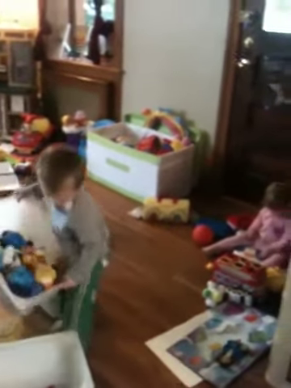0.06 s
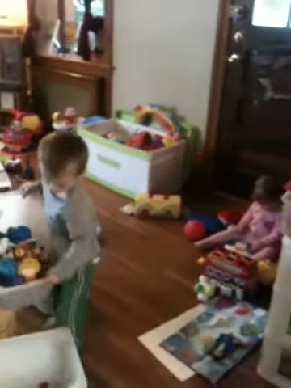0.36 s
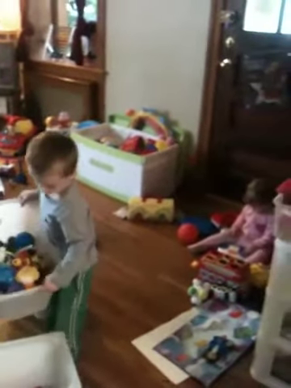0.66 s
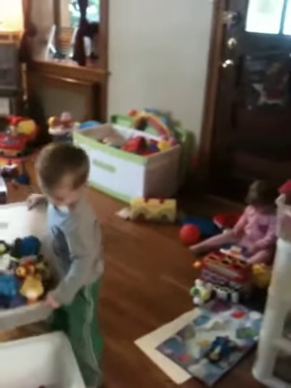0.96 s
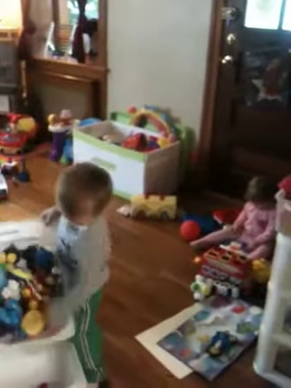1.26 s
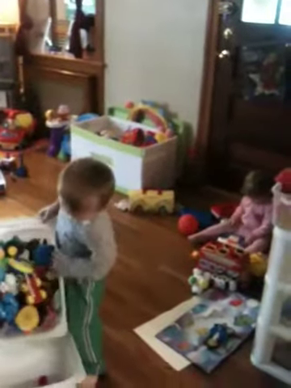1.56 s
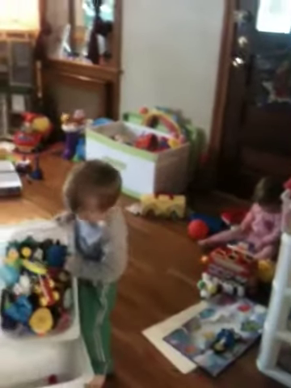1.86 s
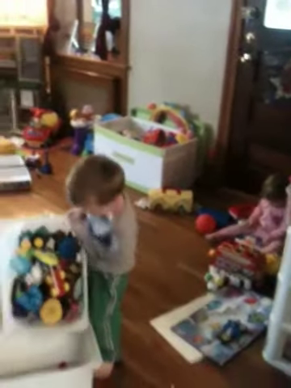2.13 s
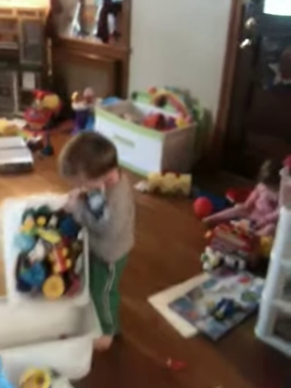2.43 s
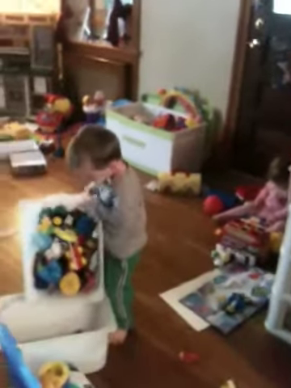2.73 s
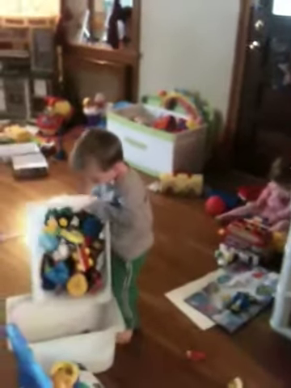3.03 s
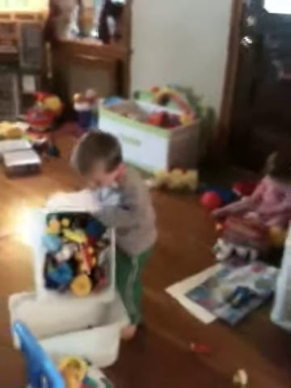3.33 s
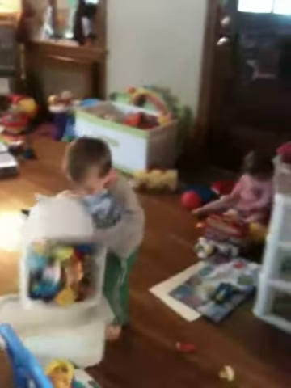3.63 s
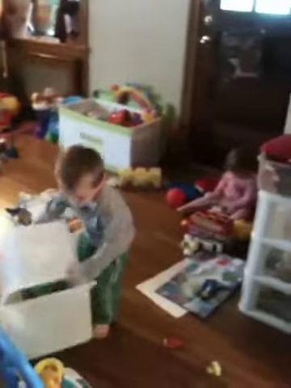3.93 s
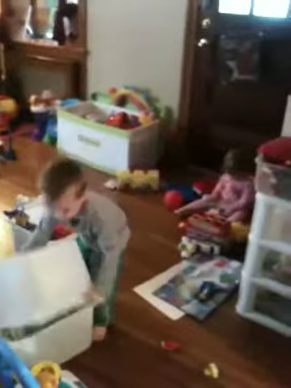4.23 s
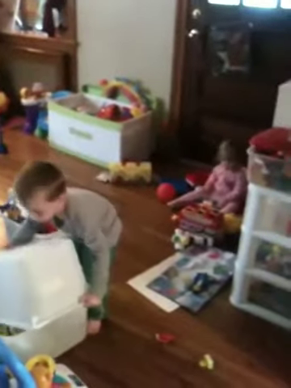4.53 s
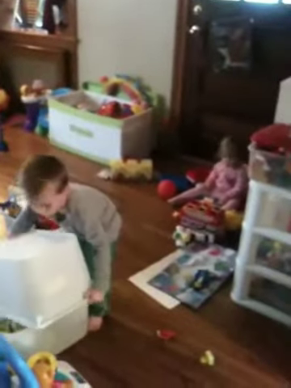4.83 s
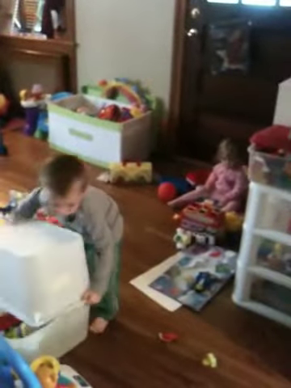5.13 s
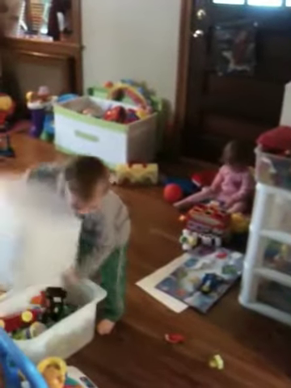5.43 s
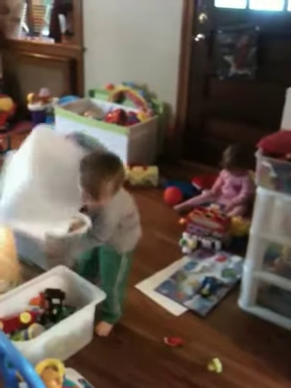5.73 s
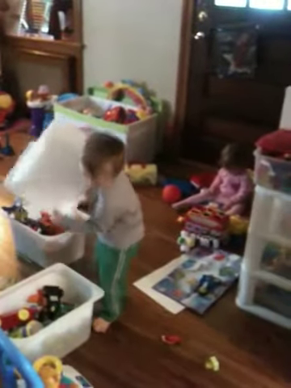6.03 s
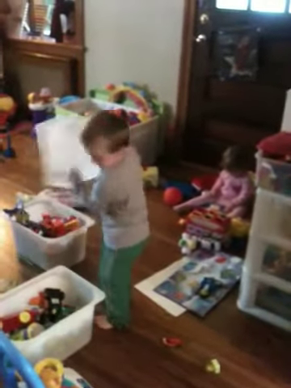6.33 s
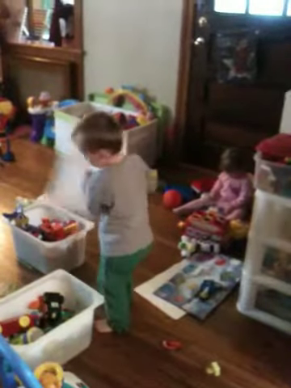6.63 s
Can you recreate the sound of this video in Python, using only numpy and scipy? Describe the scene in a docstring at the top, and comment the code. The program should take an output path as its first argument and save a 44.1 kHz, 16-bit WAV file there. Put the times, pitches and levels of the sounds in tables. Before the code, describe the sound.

In a quiet living room, a bin of plastic toys gives scattered soft rattles, clicks and dull knocks. The plastic ticks, then the load tumbles all at once into another bin with sharp clacks and hollow booms. The clatter thins, a last small spill follows, and a faint brush of cloth on plastic ends it. Everything is heard from one position, with slight room reverberation over a low hush.

```python
"""Toys tipped from bin to bin.

A child carries a plastic bin of toys across a living room and tips it into a second bin.
Hollow toys shift, clack and tumble; their blows drum on the thin walls, and strained plastic ticks.
The emptied bin is lifted away with a soft rub. A wooden-floored room answers."""
import sys
import numpy as np
from scipy import signal
from scipy.fft import rfft, irfft, next_fast_len
from scipy.io import wavfile
from scipy.ndimage import uniform_filter1d

SR = 44100
rng = np.random.default_rng(int(sys.argv[2]) if len(sys.argv) > 2 else 0)


def generate_wav(sig):
    """Save sig (samples, or channels by samples) to the path in sys.argv[1] as 16-bit PCM at SR."""
    pcm = np.round(np.clip(np.atleast_2d(sig).T, -1, 1) * 32767).astype(np.int16)
    wavfile.write(sys.argv[1], SR, pcm)


N = 295029
TIME_S = np.arange(N) / SR
BLOW_TIME_S = np.arange(SR // 2) / SR
POUR_START_S, POUR_END_S = 3.85, 5.0


def amp(db):
    """Decibels to gain."""
    return 10 ** (np.asarray(db) / 20)


def unit(x):
    """Scale to rms 1."""
    return x / np.sqrt(np.mean(x ** 2) + 1e-20)


def burst(x):
    """Scale to the energy of 5 ms at rms 1."""
    return x / np.sqrt(np.sum(x ** 2) / (.005 * SR) + 1e-20)


def curve(points):
    """Function of frequency through (f/Hz, value) points, on a log axis."""
    hz, values = np.transpose(points)
    return lambda f: np.interp(np.log(f + 1), np.log(hz + 1), values)


def hump(centre_hz, octaves, depth_db):
    """Broad resonance curve; the skirts level out depth_db below the top."""
    return lambda hz: depth_db * (1 / (1 + (np.log2((hz + 1) / centre_hz) / octaves) ** 2) - 1)


def colour(x, gain_db):
    """Minimum-phase filter with response gain_db(f)."""
    size = 2 * next_fast_len(len(x) // 2 + 4096)
    cepstrum = irfft(np.log(amp(gain_db(np.fft.rfftfreq(size, 1 / SR))) + 1e-6))
    cepstrum[1:size // 2] *= 2
    cepstrum[size // 2 + 1:] = 0
    return irfft(rfft(x, size) * np.exp(rfft(cepstrum)), size)[:len(x)]


def add(track, start_s, x):
    """Mix x into the track at start_s."""
    start = max(round(start_s * SR), 0)
    track[start:start + len(x)] += x[:N - start]


def swell(start_s, length_s, rise_db_per_s, sag_db_per_s, fall_db_per_s):
    """Attack, sagging hold and release, in dB."""
    age_s = TIME_S - start_s
    attack_db = rise_db_per_s * np.minimum(age_s, 0)
    sag_db = sag_db_per_s * np.clip(age_s, 0, length_s)
    return attack_db - sag_db - fall_db_per_s * np.maximum(age_s - length_s, 0)


def loudest(levels_db):
    """Upper envelope of overlapping levels."""
    return np.maximum(np.max(levels_db, axis=0), -120)


def ring(hz, db, t60_s):
    """Sum of damped modes with random polarity."""
    hz, db, t60_s = (np.reshape(v, (-1, 1)) for v in (hz, db, t60_s))
    modes = amp(db - 60 * BLOW_TIME_S / t60_s) * np.sin(2 * np.pi * hz * BLOW_TIME_S)
    return rng.choice([-1, 1], len(hz)) @ modes


def puff(t60_s):
    """Decaying noise: modes too dense to resolve."""
    return rng.standard_normal(len(BLOW_TIME_S)) * amp(-60 * BLOW_TIME_S / t60_s)


def chatter(blow, span_s, bounce_db, bounces=4):
    """A loose part touches several times in quick succession."""
    hits = np.zeros(SR // 20)
    hits[0] = 1
    signs = rng.choice([-1, 1], bounces)
    hits[rng.integers(20, min(span_s * SR, len(hits) - 1), bounces)] = amp(bounce_db) * signs
    return burst(signal.fftconvolve(blow, hits))


def contacts(level_db, base_rate_hz, scatter_db):
    """Random impulses whose power follows the level; louder is also denser."""
    chance = np.clip(base_rate_hz * amp(.2 * (level_db + 20)), 20, SR) / SR
    at = np.flatnonzero(rng.random(N) < chance)
    sizes = unit(amp(scatter_db * rng.uniform(-1, 1, len(at))))
    pulses = np.zeros(N)
    pulses[at] = sizes * rng.choice([-1, 1], len(at)) / np.sqrt(chance[at])
    return pulses * amp(level_db)


def play(pulses, blow):
    """Sound a unit-energy blow at every impulse."""
    return signal.fftconvolve(pulses, blow / np.linalg.norm(blow))[:N]


# living room decay: f/Hz, t60/s
ROOM_DECAY = [(100, 0.51), (260, 0.21), (700, 0.39), (2000, 0.37), (5000, 0.32), (13000, 0.41)]

def room(x, wet_db):
    """Direct sound plus a diffuse tail, different for every place in the room."""
    hz, t, noise = signal.stft(rng.standard_normal(SR // 2), SR, nperseg=256)
    decay = amp(-60 * t / curve(ROOM_DECAY)(hz)[:, None])
    tail = signal.istft(noise * decay, SR, nperseg=256)[1]
    tail *= 1 - np.exp(-np.arange(len(tail)) / SR / 0.017)
    response = amp(wet_db) * unit(tail) / np.sqrt(len(tail))
    response[0] += 1
    return signal.fftconvolve(x, response)


# hush spectrum: f/Hz, gain/dB
HUSH_SPECTRUM = [(18, -43), (30, -14), (49, -25.5), (85, -7.5), (350, -1.5), (656, -8.5), (709, -11),
                 (1230, -8), (1590, -10), (1770, -10.5), (4310, -14.5), (15500, -25.5)]
# electrical whine: f/Hz, level/dB
WHINE_TONES = [(14971, -87.5)]

def still_air(hush_db=-66.5):
    """Steady room hush with a thin electrical whine."""
    hush = amp(hush_db) * unit(colour(rng.standard_normal(N), curve(HUSH_SPECTRUM)))
    whine = sum(amp(db) * np.sqrt(2) * np.sin(2 * np.pi * hz * TIME_S) for hz, db in WHINE_TONES)
    return hush + whine


# cloth friction spectrum: f/Hz, gain/dB
RUB_SPECTRUM = [(120, -32.5), (200, -7.5), (292, 1), (419, -21), (602, -1.5), (748, -20), (1600, -11.5),
                (2900, -11.5), (15000, -29.5)]
# sleeve or hand strokes on the bin: t/s, length/s, level/dB
RUB_STROKES = [(.15, 0.19, -62), (2.34, 0.19, -65), (3.201, .25, -60), (5.888, .47, -68),
               (6.395, .15, -58.5)]

def rub(flutter_db=1.8):
    """Cloth slides over smooth plastic: a fine, uneven hiss."""
    hiss = unit(colour(rng.standard_normal(N), curve(RUB_SPECTRUM)))
    grip = unit(uniform_filter1d(rng.standard_normal(N), size=500))
    strokes_db = [db + swell(t, length_s, rise_db_per_s=131, sag_db_per_s=0, fall_db_per_s=124)
                  for t, length_s, db in RUB_STROKES]
    return hiss * amp(loudest(strokes_db) + flutter_db * grip)


# snaps in strained plastic: t/s, relative level/dB
STRAIN_TICKS = [(0.0358, -45), (0.1044, -45.5), (3.1457, -40), (3.2321, -49), (3.2809, -42),
                (3.3218, -36.5), (3.3424, -46.5), (3.3712, -40.5), (3.4246, -35.5), (3.5159, -44),
                (3.7349, -29), (5.015, -27)]

def ticks(centre_hz=5000, mode_count=6):
    """Strained plastic lets go in bright, nearly dry snaps that ping briefly."""
    track = np.zeros(N)
    tilt = curve([(200, -21.5), (2000, 2), (11000, -1.5), (15500, -3.5)])
    for t, db in STRAIN_TICKS:
        snap = colour(puff(t60_s=0.043), hump(centre_hz, octaves=0.9, depth_db=25.5))
        ping = ring(centre_hz * np.exp(rng.normal(0, .15, mode_count)), db=0, t60_s=.03)
        click = colour(burst(snap) + amp(-5.5) * burst(ping), tilt)
        add(track, t, room(amp(db) * chatter(click, span_s=.004, bounce_db=-10), wet_db=-10))
    return amp(-7.5) * track


# wall flexing spectrum: f/Hz, gain/dB
FLEX_SPECTRUM = [(18, -74), (30, -46.5), (108, -16.5), (205, -3), (385, -7), (446, -9.5), (532, -5),
                 (1000, -17.5), (1300, -46), (2200, -120)]

def bin_wall(modes, t60_scale, flex_db):
    """A struck wall: modes at random strengths over dull flexing."""
    hz, db, t60_s = np.transpose(modes)
    tone = ring(hz, db + rng.normal(0, 1.5, len(hz)), t60_scale * t60_s)
    # cut the deep rumble below the wall's ringing tones
    tone = colour(tone, curve([(30, -39.5), (90, -21.5), (170, -0.5)]))
    flex = colour(puff(t60_s=0.061), curve(FLEX_SPECTRUM))
    return burst(burst(tone) + amp(flex_db) * burst(flex))


# short, dull wall modes of the carried bin: f/Hz, level/dB, base t60/s
CARRIED_BIN_MODES = [(162, -6, 0.13), (215, -4, 0.047), (299, 2.5, 0.1), (344.2, 1, 0.11), (400, -8.5, .12),
                     (508, 3.5, 0.016), (790, -3, 0.027)]
# free wall modes: f/Hz, level/dB, base t60/s
EMPTY_BIN_MODES = [(175.4, -10, .3), (209.5, -2.5, 0.34), (251.6, -1.5, 0.12), (281.6, -2, 0.18),
                   (383.7, -3.5, 0.084), (442, -8.5, 0.056), (527.7, -2.5, 0.037), (595, -12.5, .12),
                   (732, -5.5, 0.13)]
# blows on a wall: t/s, relative level/dB, boom centre/Hz
WALL_BLOWS = [(0.353, -50, 370), (0.645, -33, 344), (1.053, -46, 280), (1.215, -34, 302),
              (1.238, -29.5, 604), (1.782, -48, 286), (1.926, -42.5, 555), (1.992, -46.5, 316),
              (2.209, -49, 312), (2.79, -43, 272), (3.09, -45, 286), (3.323, -41, 187.4),
              (3.736, -28.5, 265), (3.864, -13.5, 352), (3.921, -27, 288.6), (4.012, -9.5, 232.6),
              (4.397, -26.5, 194), (4.562, -24.5, 205), (4.864, -36, 196), (5.047, -18.5, 223),
              (6.375, -48.5, 176.4), (6.482, -46, 597)]

def thumps():
    """Heavy blows boom in a bin; where they land decides which modes speak."""
    track = np.zeros(N)
    for t, db, hz in WALL_BLOWS:
        modes = EMPTY_BIN_MODES if POUR_START_S < t < POUR_END_S else CARRIED_BIN_MODES
        wall = bin_wall(modes, t60_scale=0.57, flex_db=0.5)
        boom = colour(wall, hump(hz, octaves=1.5, depth_db=26))
        add(track, t, room(amp(db) * burst(boom), wet_db=0))
    return amp(-1.5) * track


def drumming(flow_db, modes, flex_db, wall_count=3):
    """Rolling toys keep a bin's walls sounding."""
    walls = [room(bin_wall(modes, 1, flex_db), wet_db=-9) for _ in range(wall_count)]
    track = sum(play(contacts(flow_db, base_rate_hz=200, scatter_db=2.5), wall) for wall in walls)
    return amp(0.5) * track / np.sqrt(wall_count)


# stiff toy modes: f/Hz, level/dB, t60/s
STIFF_MODES = [(1895, -2, .2), (2490, -2.5, .42), (3182, -12.5, .24), (3400, -12.5, .12)]
# jolts to that toy: t/s, level/dB
STIFF_JOLTS = [(1.459, -47), (3.6, -55), (4.347, -39), (5.14, -45)]

def stiff_toy():
    """One harder toy rings on after each jolt."""
    track = np.zeros(N)
    for t, db in STIFF_JOLTS:
        add(track, t, amp(db) * ring(*np.transpose(STIFF_MODES)))
    return track


# hollow toy modes: frequency ratio, level/dB, t60/s
HOLLOW_MODES = [(.62, -5, .015), (.8, -4, .02), (.93, -3, .03), (1.0, 0, .05), (1.06, -5, .06),
                (1.25, -4, .015), (1.6, -8, .012)]
# knocks on a hollow toy: t/s, relative level/dB, f/Hz
TOY_KNOCKS = [(1.0458, -45, 1628), (1.063, -42.5, 1534), (1.4583, -44, 1970), (2.7564, -39.5, 1576),
              (2.774, -40, 1536), (3.5965, -29, 2560), (5.765, -61, 1570)]

def knocks():
    """A knocked hollow toy gives a short note from a few close modes."""
    track = np.zeros(N)
    ratio, mode_db, t60_s = np.transpose(HOLLOW_MODES)
    for t, db, hz in TOY_KNOCKS:
        note = ring(hz * ratio, mode_db + rng.normal(0, 1, len(ratio)), t60_s)
        note = colour(note, curve([(100, -24), (900, 3.0)]))
        add(track, t, room(amp(db) * chatter(note, span_s=0.0076, bounce_db=-5.5), wet_db=-5))
    return amp(-4.5) * track


# the heap gives way: t/s, length/s, relative rattle/dB, relative drumming/dB
HEAP_SLIDES = [(0.0, .02, -42, -41), (.34, 0.057, -60, -47), (0.579, 0.068, -55.5, -50.5),
               (0.663, 0.0067, -45, -38.5), (.84, 0.0034, -61.5, -55), (1.18, .02, -48.5, -58),
               (1.239, .12, -40, -35.5), (2.788, 0.0088, -55.5, -52), (3.598, 0.026, -39, -45.5),
               (3.689, 0.24, -37.5, -38), (3.828, 0.036, -29, -34), (3.885, 0.32, -14.5, -18),
               (4.271, 0.092, -26, -29), (4.74, 0.039, -50, -45), (4.9, 0.07, -40.5, -44.5),
               (5.0, 0.14, -37.5, -40.5), (5.14, 0.065, -29, -35)]

def heap_motion(rise_db_per_s=519.5, sag_db_per_s=33, settle_db_per_s=130):
    """Slides build, thin and settle: dB envelopes for rattle, carried bin and catching bin."""
    # the toys creep while the bin is edged into place
    creep_db = swell(2, 1.55, rise_db_per_s, 0, settle_db_per_s)
    rattle, carried, catching = [creep_db - 68], [creep_db - 62], []
    for t, length_s, rattle_db, drum_db in HEAP_SLIDES:
        slide_db = swell(t, length_s, rise_db_per_s, sag_db_per_s, settle_db_per_s)
        rattle.append(rattle_db + slide_db)
        if t < POUR_START_S:
            carried.append(drum_db + slide_db)
        else:
            catching.append(drum_db + swell(t, length_s, rise_db_per_s, sag_db_per_s, fall_db_per_s=100))
    return loudest(rattle), loudest(carried), loudest(catching)


def toy_shell(base_t60_s, crack_db, mode_count=24):
    """One hollow toy: scattered modes, the higher ones shorter, over a sharp crack."""
    hz = rng.uniform(700, 14000, mode_count)
    t60_s = base_t60_s * np.sqrt(2000 / hz) * rng.uniform(0.6, 2.0, mode_count)
    modes = ring(hz, -10 * np.log10(t60_s), t60_s)  # equal energy per mode
    return burst(burst(modes) + amp(crack_db) * burst(puff(t60_s=0.014)))


# spectrum of colliding toys: f/Hz, gain/dB
TOY_SPECTRUM = [(350, -33.5), (600, -5.5), (953, -4.5), (1170, -3), (1300, -9), (1910, 5), (2130, -1.5),
                (2540, 0), (2720, -4), (3160, -5), (4260, -13), (5080, -6.5), (5980, -14.5), (10400, -25.5),
                (15500, -41.5)]

def tumble(flow_db, toy_count=14):
    """Toys collide at random, each with its own shell and place."""
    track = np.zeros(N)
    for _ in range(toy_count):
        toy = colour(toy_shell(base_t60_s=0.046, crack_db=-2), curve(TOY_SPECTRUM))
        hits = contacts(flow_db, base_rate_hz=50, scatter_db=6)
        track += play(hits, room(toy, wet_db=-5))
    return amp(-0.5) * track / np.sqrt(toy_count)


# toy hits toy: t/s, relative ring/dB, ring centre/Hz, relative crack/dB
TOY_CLACKS = [(0.003, -32, 1900, -48.5), (0.102, -43.5, 1360, -57), (0.354, -44, 1300, -60),
              (0.396, -50, 1540, -52), (0.656, -32.5, 1760, -54), (0.676, -27, 1910, -42),
              (1.216, -32.5, 1850, -38), (1.234, -29.5, 2170, -34.5), (1.269, -41, 3303, -34),
              (1.397, -23.5, 1755, -39), (1.432, -34, 1850, -54), (1.457, -20, 1910, -43),
              (1.917, -30.5, 1640, -50), (1.935, -30, 1640, -43.5), (2.307, -34, 1635, -45),
              (2.572, -43.5, 1330, -51), (3.016, -42, 1750, -72), (3.145, -41.5, 2680, -52),
              (3.562, -34.5, 1625, -48.5), (3.734, -19.5, 2650, -25.5), (3.867, -3, 2420, -8),
              (3.919, -14, 1920, -11.5), (3.983, -28, 1833, -10.5), (4.259, -23.5, 1660, -20.5),
              (4.308, -16.5, 2234, -20.5), (4.346, -14, 2260, -24.5), (4.563, -22, 1043, -35),
              (4.864, -34, 1570, -72), (5.134, -16, 2090, -25), (5.142, -19, 1748, -34),
              (5.224, -27.5, 1970, -47.5)]

def clacks(mode_count=14, bounce_span_s=.01):
    """Hard contacts: a shell rings and its edge cracks; harder hits bounce more strongly."""
    track = np.zeros(N)
    # small shells radiate little bass
    radiation = curve([(100, -20.5), (800, 1.5), (1300, -2.0), (1900, -1.0), (3500, -3.5)])
    crack_tilt = curve([(1500, -21), (4500, 4), (12000, 7)])
    for t, ring_db, hz, crack_db in TOY_CLACKS:
        mode_hz = hz * np.exp(rng.normal(0, .25, mode_count))
        mode_db = rng.normal(0, 2, mode_count)
        modes = ring(mode_hz, mode_db, t60_s=rng.uniform(.01, .02, mode_count))
        shell = colour(puff(t60_s=0.027), hump(hz, octaves=2.0, depth_db=53.5))
        body = colour(burst(modes) + amp(5) * burst(shell), radiation)
        crack = colour(puff(t60_s=0.05), lambda f: curve(TOY_SPECTRUM)(f) + crack_tilt(f))
        bounce_db = -4.5 + 0.077 * (ring_db + 20)
        blow = amp(ring_db) * chatter(body, bounce_span_s, bounce_db)
        blow += amp(crack_db) * chatter(crack, bounce_span_s, bounce_db)
        add(track, t, room(blow, wet_db=-2))
    return amp(-8.5) * track


def scene():
    """All sources at one microphone, fed to both channels."""
    rattle_db, carried_db, catching_db = heap_motion()
    carried = drumming(carried_db, CARRIED_BIN_MODES, flex_db=-7)
    catching = drumming(catching_db, EMPTY_BIN_MODES, flex_db=-9)
    toys = tumble(rattle_db) + clacks() + knocks() + stiff_toy()
    mono = toys + carried + catching + thumps() + ticks() + rub() + still_air()
    return np.array([mono, mono])


def record(dry):
    """Soft peak limiting, then a brick-wall low-pass."""
    ceiling, cutoff_hz = .72, 15750
    rounded = dry / (1 + np.abs(dry / ceiling) ** 6) ** (1 / 6)
    size = next_fast_len(N + 8192)
    passband = np.fft.rfftfreq(size, 1 / SR) < cutoff_hz
    return irfft(rfft(rounded, size) * passband, size)[:, :N]


dry = scene()
out = record(dry)
generate_wav(out)
```